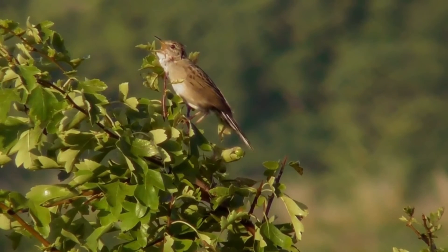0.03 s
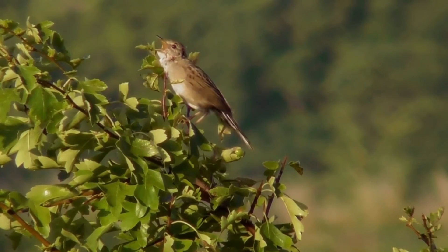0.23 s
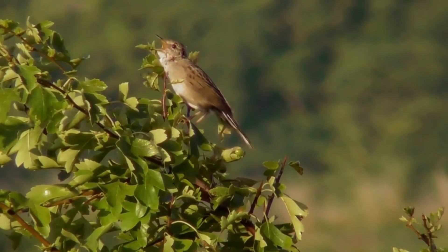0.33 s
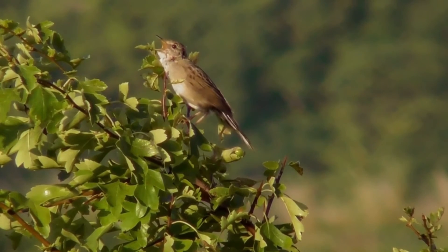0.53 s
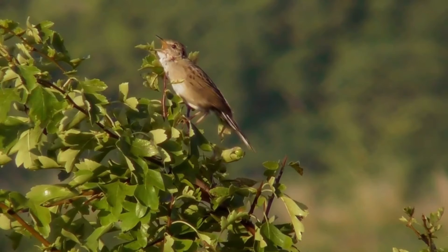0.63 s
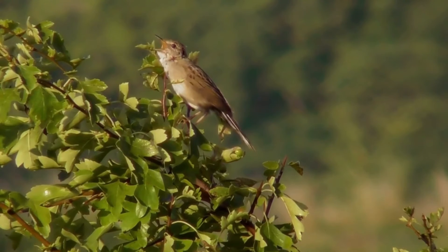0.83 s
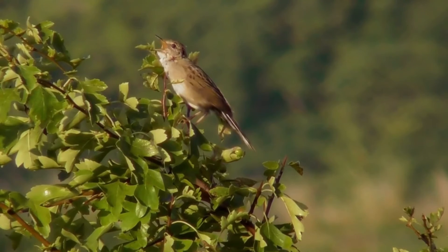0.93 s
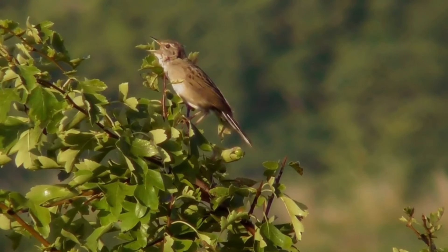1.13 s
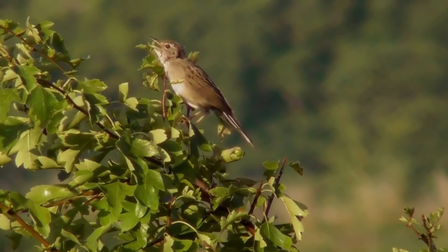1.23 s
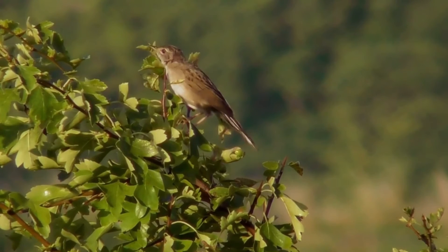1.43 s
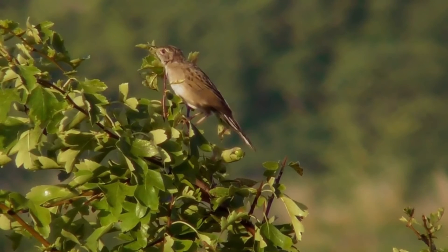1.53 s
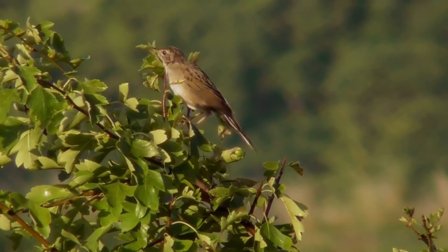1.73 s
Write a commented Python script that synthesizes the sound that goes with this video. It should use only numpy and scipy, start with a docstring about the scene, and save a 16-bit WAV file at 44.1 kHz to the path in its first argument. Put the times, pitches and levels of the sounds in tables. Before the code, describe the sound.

Close high-pitched buzzing bird trill, rapid ticking notes growing louder, over faint distant bird twitter

```python
"""A grasshopper warbler's fast reel swells close by, sung from the top of a bush, and then stops.
Each syllable, about 26 a second, is a filtered impulse (click), a rising tone burst (tick) and a loud falling tone.
Discrete echoes and decaying noise tails model the scattering by twigs and leaves.
Far off, small birds twitter as arched tones and bursts of coloured noise.
Beneath lie shaped noise for the open air, a low rumble and a faint hum of steady sinusoids."""
import sys
import numpy as np
from scipy import signal
from scipy.fft import rfft, irfft
from scipy.io import wavfile

SR = 44100
rng = np.random.default_rng(int(sys.argv[2]) if len(sys.argv) > 2 else 0)


def int16_out(signal):
    """Quantize to a 16-bit WAV file."""
    q = np.round(np.clip(np.atleast_2d(signal).T, -1, 1) * 32767)
    wavfile.write(sys.argv[1], SR, q.astype(np.int16))


N = 79380  # samples

# Spectrum of the open air, normalised in use [f/Hz, relative density level/dB]
AIR_SPECTRUM = [(25, 4.5), (60, -9), (120, -12), (250, -17), (500, -19.5), (800, -21), (1300, -12.5),
                (2600, -8), (4000, -9.5), (6000, -12.5), (8000, -12.5), (10000, -28.5), (14500, -24.5),
                (16000, -48.5)]
# Spectrum of the blur of many distant birds, normalised in use [f/Hz, relative density level/dB]
CHORUS_SPECTRUM = [(700, -36.5), (1100, -7.5), (1550, 2), (2000, -1), (2600, -12.5), (4000, -24)]
# Spectrum of the low rumble, normalised in use [f/Hz, relative density level/dB]
RUMBLE_SPECTRUM = [(25, -1.5), (80, -3), (160, -11.5), (500, -28.5), (2000, -97.5)]
# Course of the low rumble [t/s, level/dB]
RUMBLE_LEVEL = [(0.2, -82), (0.25, -68.5), (0.49, -67), (0.56, -84), (0.76, -80.5), (0.87, -66),
                (0.98, -75), (1.2, -74.5), (1.31, -64.5), (1.6, -78.5), (1.75, -76.5)]
# Steady hum lines [f/Hz, rms level/dB]
HUM_LINES = [(100, -81.5), (150, -76.5), (250, -84), (800, -91.5)]
# Stereo width of diffuse sound [f/Hz, side gain level/dB]
DIFFUSE_WIDTH = [(30, -13), (300, -3.5), (700, -3.5), (1500, -16.5), (6000, -14.5), (11000, -2)]
# Far birds' arched calls
# [t/s, length/s, start f/Hz, middle f/Hz, end f/Hz, level before trim/dB, roughness 0-1]
FAR_CALLS = [(0.054, 0.1, 1620, 1864, 1964, -61, .25), (0.148, 0.12, 1980, 2004, 1807, -63.5, 0.49),
             (0.388, 0.093, 1400, 1938, 2043, -62, 0.3), (0.419, .12, 2110, 2021, 1906, -58.5, 0.2),
             (0.53, 0.12, 1704, 2038, 1764, -60.5, .25), (0.653, 0.14, 1950, 1933, 1653, -64.5, .3),
             (0.742, .15, 1598, 1898, 1560, -65, 0.39), (0.907, 0.036, 2000, 2330, 2000, -57.5, 0.18),
             (0.965, 0.055, 1750, 2180, 1643, -54, 0.3), (0.977, 0.054, 3240, 3294, 3040, -59, 0),
             (1.233, 0.039, 1374, 1854, 2045, -51.5, .3), (1.267, 0.083, 1360, 1634, 1292, -45.5, .19),
             (1.369, 0.083, 1400, 1450, 1334, -59.5, .2), (1.454, 0.1, 3520, 3296, 2870, -66, 0.08),
             (1.542, .13, 1680, 1960, 1552, -65, 0.04)]
# Far birds' harsh chirrs [t/s, length/s, level/dB]
FAR_CHIRRS = [(.405, 0.068, -47.5), (.905, 0.054, -54.5), (.97, .06, -52.5), (1.235, 0.085, -53.5)]
# Spectrum of the chirrs, normalised in use [f/Hz, relative level/dB]
CHIRR_SPECTRUM = [(700, -37.5), (1050, -5), (1350, -3.5), (2100, 9), (2650, -7.5), (3300, -0.5), (4200, 0),
                  (7000, -39)]
# Syllables of the reel [note start t/s, note level before trim/dB, tick level before trim/dB]
REEL_SYLLABLES = [(0.0187, -31.5, -48), (0.0551, -27, -35.5), (0.093, -24.5, -37), (0.131, -22, -32.5),
                  (0.169, -19, -30), (0.2069, -16.0, -24), (0.246, -13.6, -17.1), (0.2836, -12, -20),
                  (0.3217, -11, -18), (0.3602, -9.5, -13), (0.3981, -9.5, -15), (0.436, -9, -13.5),
                  (0.4767, -11, -18.4), (0.5146, -11.0, -17), (0.5532, -13, -19.0), (0.5914, -11.5, -18.5),
                  (0.6303, -11.5, -16.5), (0.6689, -8.5, -12), (0.7071, -10, -13.5), (0.7448, -8, -16.5),
                  (0.7835, -9.5, -11.5), (0.8216, -9, -12), (0.8596, -7.3, -10), (0.8983, -8, -11),
                  (0.9365, -7.0, -10.5), (0.9747, -7.5, -7.5), (1.0128, -8.5, -9), (1.051, -8, -9.5),
                  (1.0894, -8.5, -9.5), (1.1275, -7, -10), (1.1657, -7.5, -9), (1.2033, -7, -8),
                  (1.2423, -6.5, -8.5), (1.2809, -6.0, -8), (1.3182, -5, -6.5), (1.356, -5, -6.5),
                  (1.3945, -4.5, -6), (1.433, -6, -6.5), (1.4709, -5.5, -8), (1.5124, -6.5, -13)]
# The note lengthens and falls faster as the bird warms up
# [t/s, nominal f at note start/Hz, fall/(Hz per ms), length/ms]
NOTE_EFFORT = [(0.02, 5724, 56.22, 4.15), (0.3, 5917, 92.5, 5.5), (0.85, 5934, 108.1, 5.77),
               (1.45, 5893, 118.4, 6.36)]
# The tick sinks in pitch overall as the bird warms up [t/s, f at its peak/Hz]
TICK_PEAK_PITCH = [(0.05, 7030), (0.35, 6205), (0.58, 6250), (0.85, 6076), (1.45, 5962)]
# Click filter, and normalised spectrum of the rasp [f/Hz, level/dB]
CLICK_SPECTRUM = [(1800, -25.5), (2700, -15.5), (4100, 6.5), (5200, 0.5), (7200, -8), (8300, -3.5),
                  (10000, -41.5), (16000, -48.5)]
# Reflections from the twigs and leaves [delay/ms, level/dB]
LEAF_ECHOES = [(1.8, -22), (7.3, -29.5), (9.4, -20.5), (14, -25.5)]
# Side signal that makes the song slightly louder at the right microphone [f/Hz, side gain level/dB]
RIGHT_MIC_SIDE = [(3000, -27), (4800, -23), (5700, -41), (6500, -29.5), (8000, -25)]

# Background: levels, and spread of the slow level changes (dB)
AIR_DB, AIR_SWELL_DB, CHORUS_DB, CHORUS_SWELL_DB = -64.5, 0.4, -65.5, 1.2
# Far birds: level trim (dB), relative pitch spread, flutter bandwidth (Hz)
CALL_TRIM_DB, CALL_SPREAD, CALL_FLUTTER_HZ = 1, 0.12, 345
# Far birds: left-right difference and tail level (dB), decay time (s)
FAR_PAN_DB, FAR_WET_DB, FAR_T60_S = 1, -9, 0.38
# Note: trim (dB), envelope times (ms), level rise over its first 2 ms (dB)
NOTE_TRIM_DB, NOTE_LEAD_MS, NOTE_ATTACK_MS, NOTE_RELEASE_MS, NOTE_SWELL_DB = -0.9, 0.55, 0.85, 3.22, 0.5
# Note: relative pitch spread within and between syllables, second harmonic and rasp levels (dB)
NOTE_WAVER, NOTE_SCATTER, OVERTONE_DB, RASP_DB = 0.0056, 0.0024, -66, -43
# Tick: peak ahead of the note start, rise and fall constants (ms), level trim (dB)
TICK_LEAD_MS, TICK_RISE_MS, TICK_FALL_MS, TICK_TRIM_DB = 12.1, 0.41, 0.51, -0.5
# Tick: upward sweep, limit of its rise past the peak, lowest frequency
TICK_SWEEP_HZ_PER_MS, TICK_HEADROOM_HZ, TICK_LOW_HZ = 2630, 750, 3386
# Tick rasp level (dB) and decay constant (ms)
TICK_RASP_DB, TICK_RASP_MS = -24, 1.4
# Click: time ahead of the note start (ms), level relative to the tick table before filtering (dB)
CLICK_LEAD_MS, CLICK_DB = 16.8, -5.5
# Bush and field tails: levels (dB), decay times (s), extra side level (dB)
BUSH_DB, BUSH_T60_S, FIELD_DB, FIELD_T60_S, TAIL_SIDE_DB = -20, 0.11, -42.5, 0.5, -1
TOP_HZ = 15800  # recorder passband edge


def undb(db):
    """Level-to-gain law: amplitude is ten to the power of level/20."""
    return 10 ** (np.asarray(db) / 20)


def curve(table, at, axis=1):
    """Linear interpolation of one table column."""
    table = np.array(table, float)
    return np.interp(at, table[:, 0], table[:, axis])


def colour(x, points):
    """Zero-phase spectral weighting, with level interpolated over log frequency."""
    hz, db = np.array(points, float).T
    f = np.maximum(np.fft.rfftfreq(N, 1 / SR), 1)
    gain = undb(np.interp(np.log(f), np.log(hz), db))
    return irfft(rfft(x) * gain, N)


def noise(points):
    """Spectral shaping of Gaussian white noise, normalised to unit rms."""
    x = colour(rng.standard_normal(N), points)
    return x / x.std()


def walk(rate):
    """Smooth random fluctuation of unit spread: noise under a Gaussian low-pass of width rate/Hz."""
    f = np.fft.rfftfreq(N, 1 / SR)
    lowpass = np.exp(-(f / rate) ** 2) * (f > 0)
    x = irfft(rfft(rng.standard_normal(N)) * lowpass, N)
    return x / x.std()


def ramp(u):
    """Sine-squared transition from 0 to 1."""
    return np.sin(np.clip(u, 0, 1) * np.pi / 2) ** 2


def pan(x, db):
    """Stereo placement by interchannel level difference; positive favours the left."""
    return x * undb(np.array([[db], [-db]]) / 2)


def scatter(x, t60):
    """Diffuse reverberation: convolution with exponentially decaying noise of unit energy."""
    t = np.arange(N // 2) / SR
    decay = undb(-60 * t / t60)
    tail = rng.standard_normal(len(t)) * decay * ramp(t / .004)
    return signal.fftconvolve(x, tail / np.linalg.norm(tail))[:N]


def widen(mid, side):
    """Mid-side stereo: the side signal has a frequency-dependent gain and opposite signs left and right."""
    return mid + colour(side, DIFFUSE_WIDTH) * np.array([[1], [-1]])


def outdoors():
    """Superposition of shaped noises under varying envelopes and steady sinusoidal hum lines."""
    t = np.arange(N) / SR
    air_gain = undb(AIR_DB + AIR_SWELL_DB * walk(3))
    air = air_gain * widen(noise(AIR_SPECTRUM), noise(AIR_SPECTRUM))
    chorus_gain = undb(CHORUS_DB + CHORUS_SWELL_DB * walk(10))
    chorus = chorus_gain * widen(noise(CHORUS_SPECTRUM), noise(CHORUS_SPECTRUM))
    rumble_gain = undb(curve(RUMBLE_LEVEL, t))
    rumble = rumble_gain * widen(noise(RUMBLE_SPECTRUM), noise(RUMBLE_SPECTRUM))
    hum = 0
    for hz, db in HUM_LINES:
        peak = undb(db) * np.sqrt(2)
        hum = hum + peak * np.sin(2 * np.pi * (hz * t + rng.random()))
    return air + chorus + rumble + hum


def far_birds():
    """Frequency modulation gives arched whistles, gated noise gives chirrs; reverberation blurs both."""
    t = np.arange(N) / SR
    twitter, flutter, harsh = np.zeros(N), walk(CALL_FLUTTER_HZ), noise(CHIRR_SPECTRUM)
    for start, length, first, middle, last, db, rough in FAR_CALLS:
        u = np.clip((t - start) / length, 0, 1)
        arch = np.polyfit([0, .5, 1], [first, middle, last], 2)  # parabola through three pitches
        hz = np.polyval(arch, u) * (1 + CALL_SPREAD * rough * flutter)
        envelope = np.sqrt(2 * np.abs(np.sin(np.pi * u)))
        whistle = np.sin(2 * np.pi * np.cumsum(hz) / SR)
        twitter += undb(db + CALL_TRIM_DB) * envelope * whistle
    for start, length, db in FAR_CHIRRS:
        envelope = np.sin(np.pi * np.clip((t - start) / length, 0, 1))
        twitter += undb(db) * envelope * harsh
    tail = widen(scatter(twitter, FAR_T60_S), scatter(twitter, FAR_T60_S))
    return pan(twitter, FAR_PAN_DB) + undb(FAR_WET_DB) * tail


def falling_note(start, ms, chance, waver, rasp):
    """Phase integration of a falling frequency, with a weak second harmonic and rasp, under a soft envelope."""
    top, fall, length = (curve(NOTE_EFFORT, start, axis) for axis in (1, 2, 3))
    hz = (top - fall * ms) * (1 + NOTE_SCATTER * chance + NOTE_WAVER * waver)
    phase = 2 * np.pi * np.cumsum(hz) / SR
    attack = ramp((ms + NOTE_LEAD_MS) / NOTE_ATTACK_MS)
    release = ramp((length - ms) / NOTE_RELEASE_MS)
    swell = undb(-NOTE_SWELL_DB * (0.5 - ramp(ms / 2)))
    tone = np.sin(phase) + undb(OVERTONE_DB) * np.sin(2 * phase)
    return attack * release * swell * (tone + undb(RASP_DB) * rasp)


def rising_tick(start, ms, rasp):
    """Phase integration of a fast upward sweep that saturates past the burst's peak, trailed by rasp."""
    u = ms + TICK_LEAD_MS  # time from the peak
    sweep = TICK_SWEEP_HZ_PER_MS * u
    saturated = TICK_HEADROOM_HZ * np.tanh(sweep / TICK_HEADROOM_HZ)
    hz = curve(TICK_PEAK_PITCH, start) + np.where(u < 0, sweep, saturated)
    rise = np.exp(-np.abs(u / TICK_RISE_MS) ** 1.52)
    fall = np.cosh(u / TICK_FALL_MS) ** -1.5
    burst = np.where(u < 0, rise, fall)
    tone = burst * np.sin(2 * np.pi * np.cumsum(np.maximum(hz, TICK_LOW_HZ)) / SR)
    grit = undb(TICK_RASP_DB) * ramp(u) * np.exp(-np.abs(u) / TICK_RASP_MS)
    return tone + grit * rasp


def warbler():
    """Superposition of syllables: a filtered band-limited impulse, a rising tick and a falling note."""
    song, clicks, waver, rasp = np.zeros(N), np.zeros(N), walk(900), noise(CLICK_SPECTRUM)
    t = np.arange(N) / SR
    chances = rng.standard_normal(len(REEL_SYLLABLES))
    for (start, note_db, tick_db), chance in zip(REEL_SYLLABLES, chances):
        near = np.abs(t - start) < .025
        ms = (t[near] - start) * 1000  # time from the note start
        note = falling_note(start, ms, chance, waver[near], rasp[near])
        tick = rising_tick(start, ms, rasp[near])
        impulse = np.sinc((ms + CLICK_LEAD_MS) * SR / 1000)
        song[near] += undb(note_db + NOTE_TRIM_DB) * note + undb(tick_db + TICK_TRIM_DB) * tick
        clicks[near] += undb(tick_db + CLICK_DB) * impulse
    return song + colour(clicks, CLICK_SPECTRUM)


def bush(song):
    """Multipath propagation: discrete leaf echoes and faint diffuse tails join the direct sound."""
    f = np.fft.rfftfreq(N, 1 / SR)
    # a delay is a phase rotation proportional to frequency
    leaves = sum(undb(db) * np.exp(-2j * np.pi * f * ms / 1000) for ms, db in LEAF_ECHOES)
    near = song + irfft(rfft(song) * leaves, N)
    mid, side = (undb(BUSH_DB) * scatter(song, BUSH_T60_S) + undb(FIELD_DB) * scatter(song, FIELD_T60_S)
                 for _ in range(2))
    tail = widen(mid, undb(TAIL_SIDE_DB) * side)
    return near + colour(near, RIGHT_MIC_SIDE) * np.array([[-1], [1]]) + tail


def scene():
    """Linear superposition of the open air, the far birds and the warbler in its bush."""
    return outdoors() + far_birds() + bush(warbler())


def record(dry):
    """Band limitation: the recorder's elliptic low-pass cuts the very top."""
    lowpass = signal.ellip(8, .1, 70, TOP_HZ, fs=SR, output="sos")
    return signal.sosfilt(lowpass, dry)


dry = scene()
out = record(dry)
int16_out(out)
```